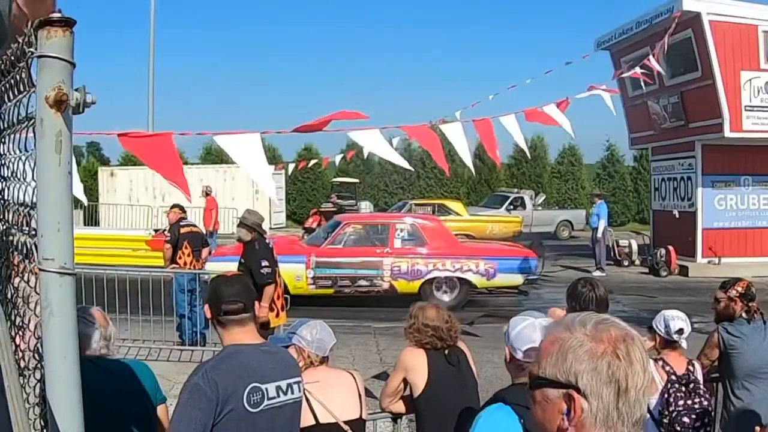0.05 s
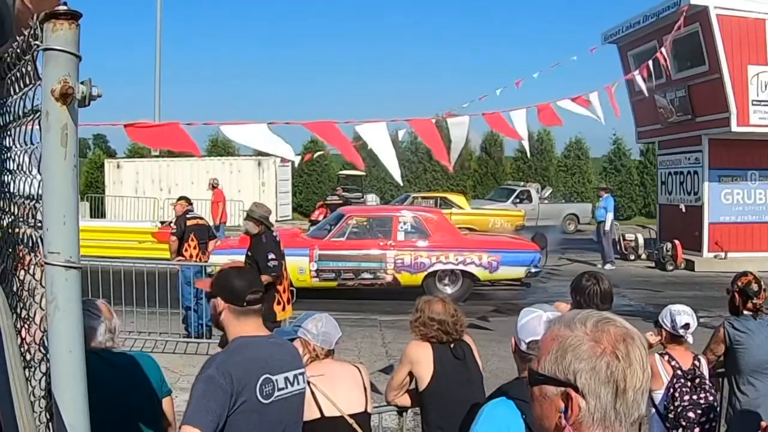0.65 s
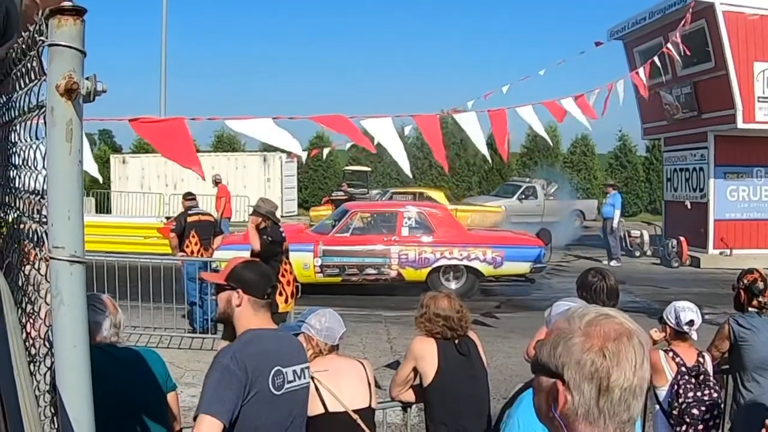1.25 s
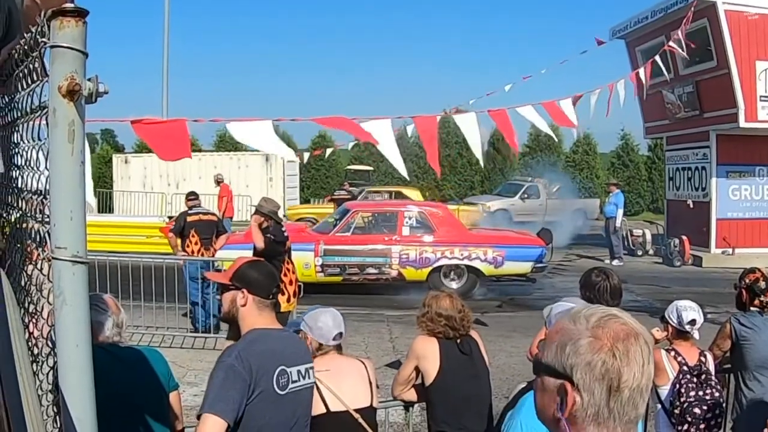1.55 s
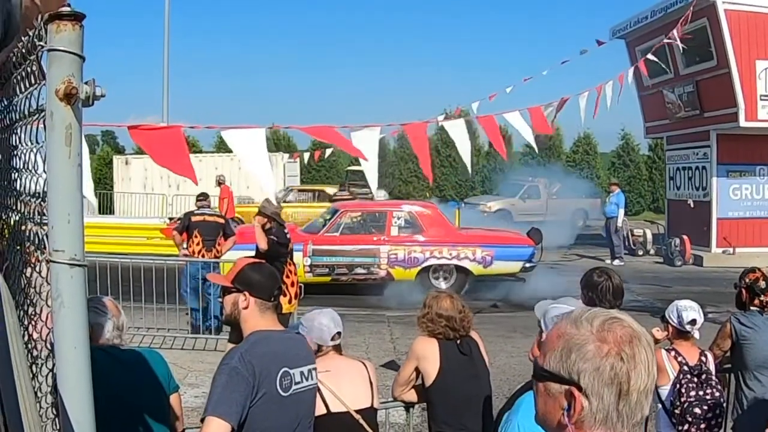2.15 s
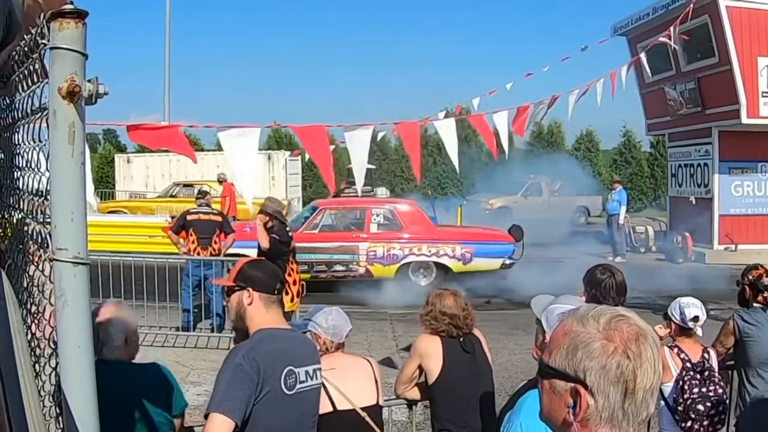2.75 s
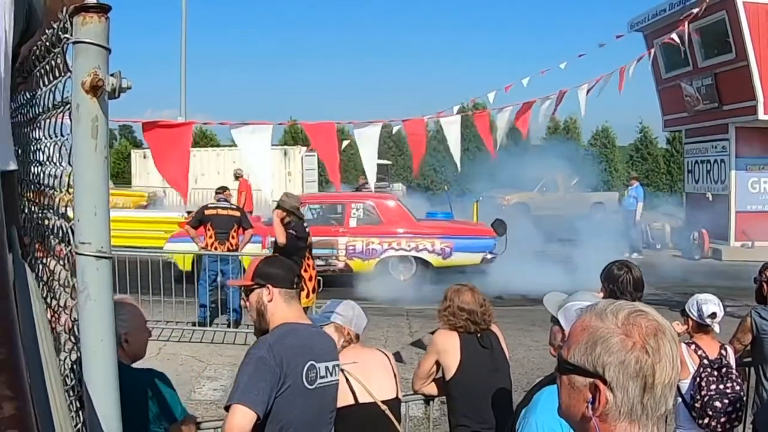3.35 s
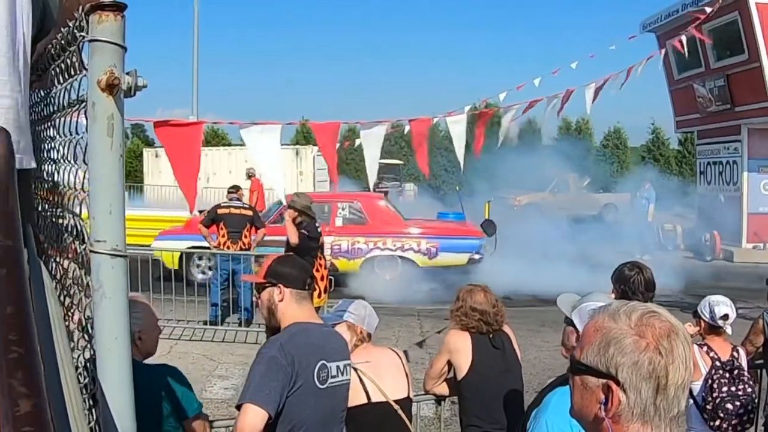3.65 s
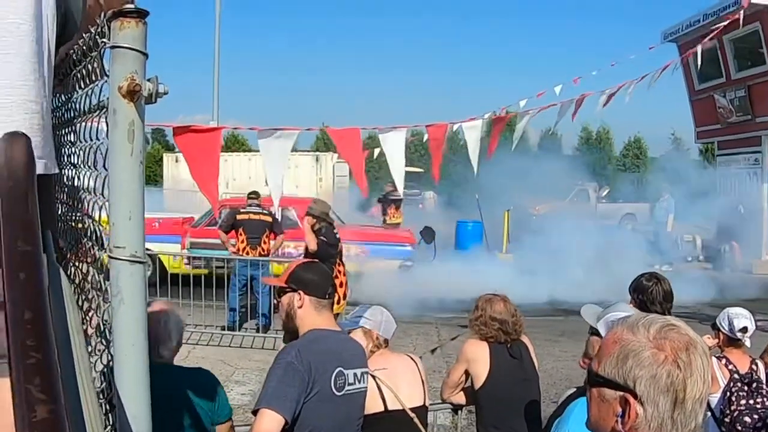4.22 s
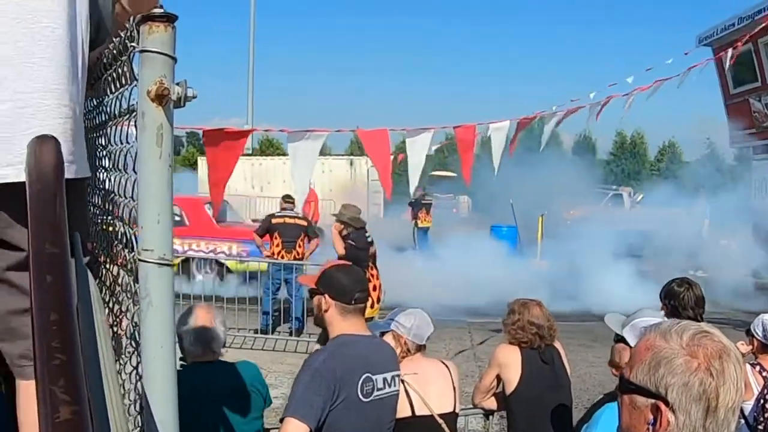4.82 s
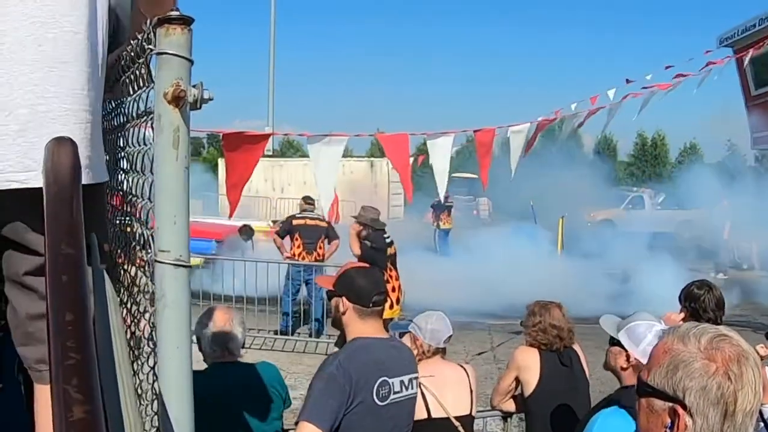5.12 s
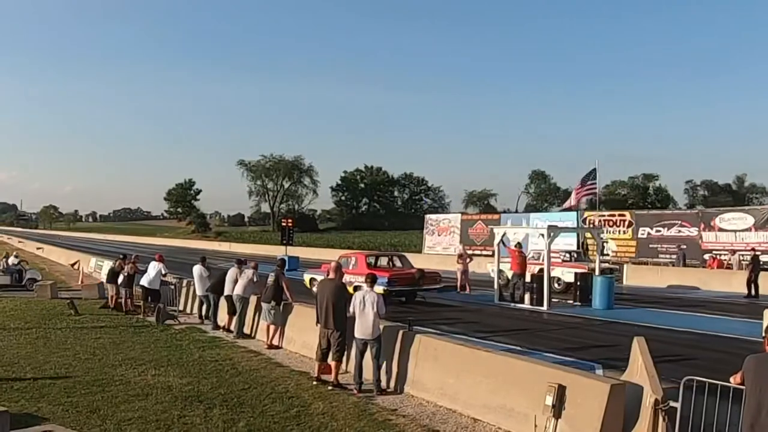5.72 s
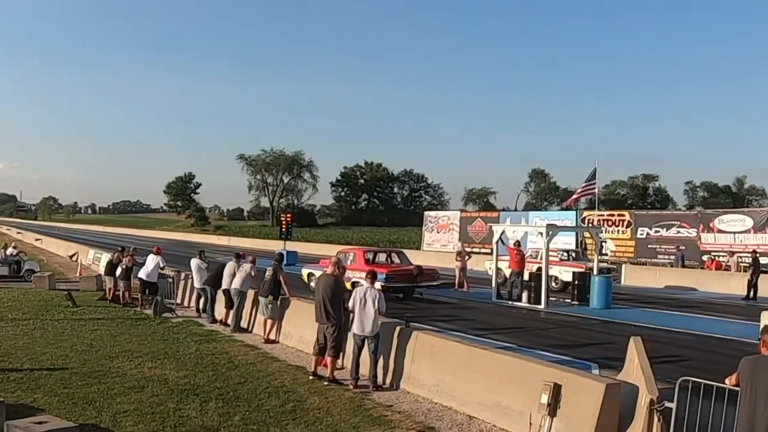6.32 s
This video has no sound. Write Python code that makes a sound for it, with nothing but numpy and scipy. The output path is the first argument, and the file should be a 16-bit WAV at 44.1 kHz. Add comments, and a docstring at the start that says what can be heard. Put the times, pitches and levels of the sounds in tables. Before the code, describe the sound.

A loud V8 drag car with open exhausts is doing a burnout outdoors, heard from behind the spectators. It revs up at once and stays high for the first second, a booming, barking note with rasp and crackle. At about 1.1 seconds the pitch drops, then wavers, bogging down near 1.6 and 2.5 seconds. From about 3 seconds the revs climb a little and the sound widens as the car rolls past, with a harder bite. The tyres sizzle faintly around 3 and 4.5 seconds, and light gusts thump on the microphone near 0.8 and 4.4 seconds. At 5.3 seconds the sound cuts to a brief silence. From about 5.4 seconds the engine is on the start line, rumbling and stuttering unevenly against its launch limiter. Around 6.5 seconds the revs start to rise as the car begins to pull away.

```python
"""A drag strip, with the microphone behind the spectators. A V8 with open headers does a burnout: it revs
high, bogs down as the slicks heat up, then rolls past. Its firings make a booming, barking note; turbulent
gas adds rasp and crackle. The tyres sizzle and gusts thump on the microphone. After a brief silence the
car is on the start line, stuttering as the launch limiter cuts sparks, and begins to pull away."""
import sys
import numpy as np
from scipy import signal
from scipy.fft import rfft, irfft, next_fast_len
from scipy.io import wavfile
from scipy.ndimage import uniform_filter1d, minimum_filter1d

SR = 44100
rng = np.random.default_rng(int(sys.argv[2]) if len(sys.argv) > 2 else 0)


def wav_record(signal):
    """Record a signal, one row per channel, as 16-bit PCM in the file named by sys.argv[1]."""
    frames = np.transpose(np.atleast_2d(signal))
    bounded = np.clip(frames, -1, 1)
    # unit amplitude maps onto the largest positive 16-bit level
    quanta = np.round(bounded * 32767).astype(np.int16)
    wavfile.write(sys.argv[1], SR, quanta)


N = 289737

# firing order from one side of the track, near bank loud: (level [dB], path delay [s])
CYLINDERS = [(-5, 0.00014), (6.5, 0), (-0.5, 0.0025), (-2.5, 0), (-3, 0.00095), (-10.5, 0.0042),
             (-6, 0.0016), (-24, 0.023)]


def burnout():
    """Full throttle on spinning tyres: turbulence and shock crackle ride on the exhaust's pressure waves."""
    # engine speed in the first two gears, then in top: (time [s], cycle rate [Hz])
    run_up = [(0.0, 41.9), (0.144, 50.3), (0.246, 53.7), (0.302, 52.2), (0.358, 47.8), (0.562, 52.6),
              (0.686, 54.2), (0.756, 53.5), (0.998, 54.5), (1.044, 52.1), (1.11, 44.7)]
    top_gear = [(1.13, 43.7), (1.31, 43.0), (1.6, 39.5), (1.76, 40.7), (1.92, 43.4), (2.05, 44.7),
                (2.12, 43.9), (2.32, 39.4), (2.47, 38.0), (2.8, 41.5), (3.23, 43.3), (3.55, 46.1),
                (3.93, 44.6), (4.31, 47.0), (4.42, 46.4), (4.74, 46.5), (4.99, 45.9), (5.27, 44.1)]
    # the note is cleanest in mid revs: (cycle rate [Hz], turbulent share before rolling [0-1])
    ragged_by_speed = [(38, .62), (41.5, .48), (46.5, .42), (51, .68)]
    # exhaust noise spectra: (frequency [Hz], level [dB])
    rumble_colour = [(20, -33), (40, -12), (65, -8), (100, 7.5), (135, -35.5), (175, -3), (260, -2),
                     (380, -5), (480, -10), (700, -23)]
    bark_colour = [(330, -40), (480, -5), (620, -6), (760, 3), (950, -11.5), (1150, -3), (1400, -13.5),
                   (1900, -15)]
    rasp_colour = [(1000, -37), (1350, 4), (1500, -12), (1750, 2), (1950, 0), (2170, 4), (2380, -6.5),
                   (2750, 0.5), (3100, -2), (3700, -2), (5000, -27)]
    speed, = in_time(run_up + top_gear)
    cycles = np.cumsum(speed) / SR
    rolling = ramp(np.arange(N) / SR, 2.5, 3.1)
    ragged = np.interp(speed, *np.transpose(ragged_by_speed)) * (1 - .33 * rolling)
    boom, bark, rasp = exhaust_note(cycles, speed, flutter_db=(1.0, 2.0, 2.6),
                                    fading_db=(.6, 2.2, 2.2), wander=(.09, .2, .3))
    surge = rms_one(from_db(0.92 * boom))  # the jets roar hardest at the crest of the boom
    gas = surge * throb(cycles, depth_db=1.5) * rng.standard_normal(N)
    bark = blend(bark, rms_one(colour(gas, bark_colour)), ragged)
    rasp = blend(rasp, rms_one(colour(gas, rasp_colour)), .1 + ragged)
    pulses = firings(cycles, uneven_db=2.5, jitter_s=.00002, cut_share=0)
    rasp = blend(echoed(colour(pulses, rasp_colour)), rasp, rough=.93)
    crackle = shock_crackle(cycles, surge)
    exhaust = mix_voices(speed, rumble=noise(rumble_colour), boom=boom, bark=bark, rasp=rasp, crackle=crackle)
    return exhaust + pipe_bite(cycles, pulses) + pipe_drone()


def exhaust_note(cycles, speed, flutter_db, fading_db, wander):
    """The engine's harmonics in three groups of rms 1: boom, bark and rasp. Higher groups waver more."""
    # one row per harmonic of the cycle rate: (level behind the car [dB], level beside it [dB])
    harmonics = [(-30.5, -22), (-23.5, -19), (-9.5, -7.5), (-11.5, -11.5), (0.5, 0), (-15, -12),
                 (-13.5, -17), (-8, -14), (-14.5, -14.5), (-18, -10), (-15, -27), (-33.5, -19), (-16, -11),
                 (-12, -22), (-28.5, -30.5), (-15, -12), (-25, -27), (-15.5, -18), (-14.5, -16), (-31, -29),
                 (-14.5, -20), (-21.5, -25.5), (-36, -26), (-25, -18.5), (-45, -30.5), (-16, -13.5),
                 (-28, -17.5), (-49, -34), (-32, -14), (-40, -21.5), (-16, -21), (-24, -36), (-44, -32),
                 (-24.5, -23.5), (-36.5, -22.5), (-43, -25), (-53.5, -47), (-46, -22), (-19.5, -42),
                 (-31, -34.5), (-21, -28), (-44, -16.5), (-31, -25), (-37.5, -37.5), (-34.5, -40.5),
                 (-25, -29.5), (-38, -24.5), (-52, -39.5), (-26, -34), (-32.5, -26)]
    # the bark's peak shifts as the pipes turn to the microphone: (time [s], frequency [Hz], lift [dB])
    bark_peak = [(0, 776, 10.5), (.55, 743, 6.5), (1.0, 720, 7.5), (1.25, 760, 14), (2.1, 745, 8),
                 (2.5, 530, 2.5), (2.85, 594, 7), (3.25, 710, 9), (3.6, 700, 2), (4.0, 761, 15.5),
                 (4.55, 780, 6), (4.9, 915, 11)]
    peak_hz, lift_db = in_time(bark_peak)
    beside, = in_time([(3.15, 0.069), (3.55, 0.89)])
    sag = ramp(speed, 42.5, 38.1)
    sag_lift_db = {6: 17, 7: 7}  # these harmonics take over as the revs sag
    sound, power = np.zeros((2, 3, N))
    for k, (behind_db, beside_db) in enumerate(harmonics, 1):
        group = int(k > 10) + int(k > 30)
        line_db = behind_db + beside * (beside_db - behind_db) + sag * sag_lift_db.get(k, 0)
        if k == len(CYLINDERS):  # the firing tone stands out while the car is abreast
            line_db += 7.5 * swell(at_s=3.84, length_s=0.49)
        if group == 0:  # a pipe resonance, and the trough before the next
            line_db += 3.9 * bump(k * speed, centre_hz=234, width_hz=20)
            line_db -= 12.0 * bump(k * speed, centre_hz=528, width_hz=37)
        if group == 1:
            line_db += lift_db * bump(k * speed, peak_hz, width_hz=62)
        if group == 2:  # the pipe mouths ring
            line_db += 9.4 * bump(k * speed, centre_hz=2085, width_hz=91)
        gain = from_db(line_db + flutter_db[group] * drift(5.1) + fading_db[group] * drift(3.7))
        phase = 2 * np.pi * (k * cycles + rng.random()) + wander[group] * drift(28.0)
        sound[group] += gain * np.sin(phase)
        power[group] += gain ** 2 / 2
    return sound / np.sqrt(power)


def mix_voices(speed, **voices):
    """Each exhaust voice follows effort, gear shifts and revs; the pipes beam some at the microphone."""
    # how hard the engine works: (time [s], effort above its mean [dB])
    effort = [(0, 1), (.12, -0.8), (.25, -2.2), (.62, -3.2), (.74, 0.3), (1.1, 0.5), (1.68, -1.5),
              (1.92, 3), (2.06, 3), (2.2, -2), (2.55, -1.5), (2.9, 1.3), (3.35, -1.0), (4.05, 1.2),
              (4.4, 3.5), (4.75, 3), (4.92, 0.2), (5.25, -1.0)]
    # the note flares as the clutch bites, off the mark and at upshifts: (time [s], length [s], strength [0-1])
    shifts = [(0.09, 0.073, 0.74), (0.375, .035, 0.84), (1.126, 0.024, 0.8)]
    # per voice: (base level [dB], effort slope [dB/dB], lift in a shift [dB], at top revs [dB], bogged [dB])
    responses = {"rumble": (-23, 0.56, 3, 8, 3.5), "boom": (-10.5, 0.36, -1.0, -3.5, 0.5),
                 "bark": (-20.5, .5, 6.5, 1.1, -2), "rasp": (-32, 1.2, 6, -3.2, -2.5),
                 "crackle": (-37, 1.23, -0.4, .2, 1)}
    # the pipes' aim as the car rolls past: (time [s], boom [dB], bark [dB], rasp [dB])
    beaming = [(.9, 0, -2.5, -0.5), (1.3, -1, 0, -1), (2.65, -1.5, -3, 0), (3.25, -3.5, 0.5, 0.5),
               (3.45, -2, 0.5, 3), (3.72, -2, -2.5, 2), (4.0, -3.5, -0.5, -4.5), (4.15, -5, -3, 1),
               (4.45, -9.5, -2.5, -2), (4.8, -3.5, -3.5, -0.5), (5.2, -1.5, -2, 1.5)]
    effort_db, = in_time(effort)
    beam_db = dict(zip(("boom", "bark", "rasp"), in_time(beaming)))
    flare = sum(strength * swell(s, length_s) for s, length_s, strength in shifts)
    top, bogged = ramp(speed, 47, 58), ramp(speed, 40.8, 38.1)
    mix = 0
    for name, (base_db, slope, shift_db, top_db, bogged_db) in responses.items():
        level_db = base_db + slope * effort_db + shift_db * flare + top_db * top + bogged_db * bogged
        mix += from_db(level_db + beam_db.get(name, 0)) * voices[name]
    return mix


def start_line():
    """The launch limiter cuts sparks at random, so the exhaust stutters; the revs rise as the car is let go."""
    # engine speed: (time [s], cycle rate [Hz])
    revs = [(5.4, 38.8), (5.7, 39.0), (6.0, 37), (6.3, 40.6), (6.4, 38.2), (6.48, 38), (6.57, 43.7)]
    # levels before each voice's trim: (time [s], rumble [dB], bark [dB], crackle [dB])
    levels = [(5.47, -14, -23.5, -34), (5.65, -13.5, -23.5, -36.5), (5.92, -14, -23.5, -37),
              (6.15, -10.5, -22, -36), (6.4, -14, -22.5, -36.5), (6.57, -15, -19.5, -37.5)]
    # exhaust tones: (multiple of the cycle rate, level on the limiter [dB], level fully free [dB])
    partials = [(2.77, -23.5, -23), (5, -27.5, -10.5), (6, -20, -22), (7, -18.5, -31), (8, -35, -18),
                (12, -38.5, -30.5), (16.5, -43, -38), (17.45, -35, -34)]
    # exhaust noise spectra: (frequency [Hz], level [dB])
    rumble_colour = [(20, -39), (42, 2.5), (70, -3.5), (105, 4), (145, -0.5), (200, -2.5), (290, -11),
                     (350, -9.5), (550, -28)]
    bark_colour = [(190, -24), (330, -13), (380, -14.5), (476, -4), (595, 0.5), (691, 2), (916, -5),
                   (1050, -2), (1170, 0), (1360, -13), (1670, -6.5), (1870, -18.5), (1970, -28),
                   (2230, -26), (2400, -53), (3120, -42), (5280, -120)]
    crackle_colour = [(1290, -27), (2200, -1), (3530, -7), (4570, -6), (5240, -8), (6300, -15),
                      (8350, -21.5), (9800, -27.5), (11900, -32), (15000, -57)]
    speed, = in_time(revs)
    let_go, = in_time([(6.41, 0.038), (6.53, 0.86)])
    rumble_db, bark_db, crackle_db = in_time(levels)
    cycles = np.cumsum(speed) / SR
    bangs = firings(cycles, uneven_db=3.5, jitter_s=0.0003, cut_share=.3)
    gas = puffs(bangs, decay_s=0.018, steady=0.84)
    rumble = from_db(rumble_db - 2.5) * rms_one(colour(gas, rumble_colour))
    bark = blend(echoed(colour(bangs, bark_colour)), rms_one(colour(gas, bark_colour)), rough=0.91)
    crackle = from_db(crackle_db + 2.0) * rms_one(colour(gas, crackle_colour))
    note = 0
    for k, held_db, free_db in partials:
        gain = np.sqrt(2) * from_db(held_db + let_go * (free_db - held_db) + 2.8 * drift(4.5))
        note += gain * np.sin(2 * np.pi * k * cycles + 0.63 * drift(15.5))
    return rumble + from_db(bark_db + 1.2) * bark + crackle + note


def firings(cycles, uneven_db, jitter_s, cut_share):
    """One pulse each time an exhaust valve opens; a share of the sparks may be cut."""
    k = np.arange(int(cycles[-1] * len(CYLINDERS)))
    cylinder_db, path_s = np.array(CYLINDERS)[k % len(CYLINDERS)].T
    timing, force = rng.standard_normal((4096, 2))[k].T
    fired = rng.random(4096)[k] >= cut_share
    arrival = np.interp(k / len(CYLINDERS), cycles, np.arange(N)) + SR * (path_s + jitter_s * timing)
    strength = fired * from_db(cylinder_db + uneven_db * np.minimum(force, 2.5))
    return np.bincount(np.maximum(arrival, 0).astype(int), strength, N)[:N]


def puffs(pulses, decay_s, steady):
    """Turbulent gas: a burst of noise after every pulse, over a steady jet."""
    burst = rms_one(signal.lfilter([1], [1, -np.exp(-1 / (decay_s * SR))], pulses + 1e-18))
    return rms_one((steady + burst) * rng.standard_normal(N))


def throb(cycles, depth_db):
    """The near bank's firings bunch up, so the gas noise pulses once in each engine cycle."""
    return rms_one(from_db(depth_db * np.cos(2 * np.pi * (cycles - 2 / len(CYLINDERS)))))


def pipe_drone():
    """The lowest resonance of the pipes: a wavering tone, stirred by turbulence."""
    # the drone's rise and fall: (time [s], level [dB])
    levels = [(0, -24), (.4, -16.5), (1.3, -20), (1.8, -16), (2.15, -31), (3.2, -21.5), (4.5, -21.5),
              (4.9, -33)]
    # its turbulence: (frequency [Hz], level [dB])
    spectrum = [(100, -9), (126, -24.5), (138, 0.5), (152, 2.5), (164, -26.5), (200, -13.5)]
    drone_hz = 141
    level_db, = in_time(levels)
    tone = rms_one(np.sin(2 * np.pi * drone_hz * np.arange(N) / SR + 1.9 * drift(4.6)))
    return from_db(level_db) * blend(tone, noise(spectrum), rough=0.68)


def shock_crackle(cycles, surge):
    """Uneven shocks leave the pipes, each trailing a puff of hiss."""
    # the crackle's treble: (frequency [Hz], level [dB])
    spectrum = [(2200, -13), (3300, -4), (4000, 0.5), (4900, -0.5), (5800, 2), (6900, -2.5), (8100, -10),
                (9000, -8.5), (10000, -13), (12500, -22.5), (15000, -36.5)]
    shocks = firings(cycles, uneven_db=6.0, jitter_s=.00003, cut_share=0)
    hiss = surge * throb(cycles, depth_db=0.5) * puffs(shocks, decay_s=0.011, steady=1.0)
    return blend(echoed(colour(shocks, spectrum)), rms_one(colour(hiss, spectrum)), rough=0.99)


def pipe_bite(cycles, pulses):
    """Each firing bites as the pipe mouths sweep past the microphone."""
    # the sweeps: (time [s], length [s], level [dB])
    sweeps = [(3.601, 0.2, -37), (4.144, 0.1, -41), (4.6, 0.71, -43.5)]
    # the bite's hard edge: (frequency [Hz], level [dB])
    spectrum = [(2200, -10), (2600, 8), (2850, 0), (3150, 3), (3600, -38)]
    level = sum(from_db(db) * swell(s, length_s) for s, length_s, db in sweeps)
    return level * throb(cycles, depth_db=1.0) * echoed(colour(pulses, spectrum))


def tyres():
    """Hot rubber sizzles on the wet track."""
    # surges from the spinning slicks: (time [s], length [s], level [dB])
    sizzles = [(2.93, 0.35, -42.5), (4.45, 0.25, -40)]
    # their hiss: (frequency [Hz], level [dB])
    spectrum = [(4500, -17), (5700, 3.5), (6800, -4), (8100, -26), (9000, 1), (10000, -15), (14000, -28)]
    level = sum(from_db(db) * swell(s, length_s) for s, length_s, db in sizzles)
    return level * from_db(1.5 * drift(30)) * noise(spectrum)


def wind(breeze_db=-45):
    """Light gusts thump on the microphone."""
    # gusts: (time [s], length [s], level above the breeze [dB])
    gusts = [(0.843, .17, 19), (4.43, .18, 15)]
    # low buffeting: (frequency [Hz], level [dB])
    spectrum = [(18, -29), (32, -18), (45, -9.5), (62, -4), (110, -35)]
    level_db = breeze_db + sum(db * swell(s, length_s) for s, length_s, db in gusts)
    return from_db(level_db) * noise(spectrum)


def echoed(x):
    """Direct sound plus a few reflections; rms 1."""
    # off ground, wall and tower: (delay [s], level [dB])
    echoes = [(.0031, -3), (.0127, -0.5), (.037, -15.5), (.071, 0)]
    n = np.arange(N)
    return rms_one(x + sum(from_db(db) * np.interp(n - s * SR, n, x, left=0) for s, db in echoes))


def spread(x, scatter_s, count=4):
    """Fence and crowd scatter the sound to left and right, along paths that shift as the car moves."""
    # the image opens as the car rolls past: (time [s], side level [dB])
    opening = [(0, -96), (2.7, -21), (2.95, -4), (3.3, -2), (5.3, 3), (5.38, -51)]
    # diffuse sound, image open: (frequency [Hz], side against mid [dB])
    width = [(60, -21), (130, -42), (230, -32), (400, -20), (700, -9), (1300, -8), (2300, -0.5), (4400, -6),
             (8000, -3.5), (14000, -4)]
    # balance, image open: (frequency [Hz], left minus right [dB])
    balance = [(20, .5), (400, 0), (700, -2), (1300, -5), (2300, 3), (4400, -1), (8000, -4.5), (15000, 5)]
    opening_db, = in_time(opening)
    t = np.arange(4096) / SR
    paths = rng.standard_normal((count, len(t))) * np.exp(-t / scatter_s)
    shares = np.array([drift(2.45) for _ in paths])
    shares /= np.linalg.norm(shares, axis=0)
    scattered = sum(share * signal.fftconvolve(x, path / np.linalg.norm(path))[:N]
                    for share, path in zip(shares, paths))
    left = colour(x, [(hz, db / 2) for hz, db in balance])
    right = colour(x, [(hz, -db / 2) for hz, db in balance])
    side = from_db(opening_db) * (colour(scattered, width) + (left - right) / 2)
    return np.array([x + side, x - side])


def from_db(db):
    """Decibels to gain."""
    return 10 ** (np.asarray(db) / 20)


def rms_one(x):
    """Scale to unit rms."""
    return x / np.sqrt(np.mean(x ** 2) + 1e-20)


def in_time(rows):
    """Each column of a curve at every sample."""
    s, *columns = np.transpose(rows)
    return [np.interp(np.arange(N) / SR, s, c) for c in columns]


def colour(x, spectrum):
    """Filter by (frequency [Hz], level [dB]) rows, falling 36 dB an octave beyond their ends."""
    size = next_fast_len(N + 8192)
    hz, db = np.transpose(spectrum)
    bins = np.maximum(np.arange(size // 2 + 1) * SR / size, 1)
    octaves_outside = np.maximum(np.log2(bins / hz[-1]), 0) + np.maximum(np.log2(hz[0] / bins), 0)
    gain = from_db(np.interp(np.log(bins), np.log(hz), db) - 36 * octaves_outside)
    return irfft(rfft(x, size) * gain, size)[:N]


def noise(spectrum):
    """Coloured noise of rms 1."""
    return rms_one(colour(rng.standard_normal(N), spectrum))


def drift(rate_hz, size=4096):
    """Slow random wander of rms 1."""
    hz = np.arange(size // 2 + 1) * SR / N
    slow = irfft(rfft(rng.standard_normal(size)) / (1 + (hz / rate_hz) ** 2))
    return np.interp(np.arange(N) * (size / N), np.arange(size), rms_one(slow))


def blend(clean, noisy, rough):
    """Equal-power mix; rough is the amplitude share of the noisy sound."""
    rough = np.clip(rough, 0, 1)
    return np.sqrt(1 - rough ** 2) * clean + rough * noisy


def bump(hz, centre_hz, width_hz):
    """Shape of a resonance, 1 on top."""
    return 1 / (1 + ((hz - centre_hz) / width_hz) ** 2)


def swell(at_s, length_s):
    """A smooth rise and fall, 1 at its middle."""
    return np.exp(-((np.arange(N) / SR - at_s) / length_s) ** 2)


def ramp(x, start, end):
    """0 before the start, 1 after the end, straight in between."""
    return np.clip((x - start) / (end - start), 0, 1)


def scene():
    """From behind the crowd: the burnout, a dip to near silence, then the start line."""
    t = np.arange(N) / SR
    change_s, level_db, gap_db = 5.35, 0.5, -64
    fade_out = ramp(t, 5.285, 5.272) ** 2
    fade_in = ramp(t, 5.388, 5.459) ** 2
    track = np.where(t < change_s, burnout() + tyres() + wind(), start_line())
    return spread(track, scatter_s=0.0076) * (from_db(level_db) * (fade_out + fade_in) + from_db(gap_db))


def record(dry):
    """After the microphone, a limiter ducks smoothly around peaks and a steep filter cuts the top treble."""
    ceiling, hold_s, stop_hz = 0.8, 0.012, 15900
    hold = int(hold_s * SR)
    gain = np.minimum(1, ceiling / (np.abs(dry).max(axis=0) + 1e-9))
    held = dry * uniform_filter1d(minimum_filter1d(gain, hold), hold)
    return signal.sosfilt(signal.cheby2(14, 60, stop_hz, fs=SR, output="sos"), held)


dry = scene()
out = record(dry)
wav_record(out)
```